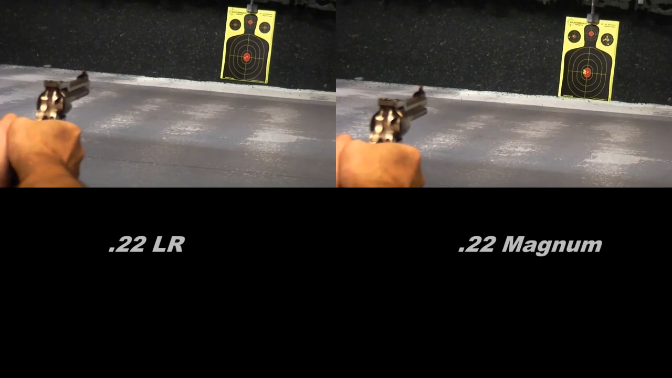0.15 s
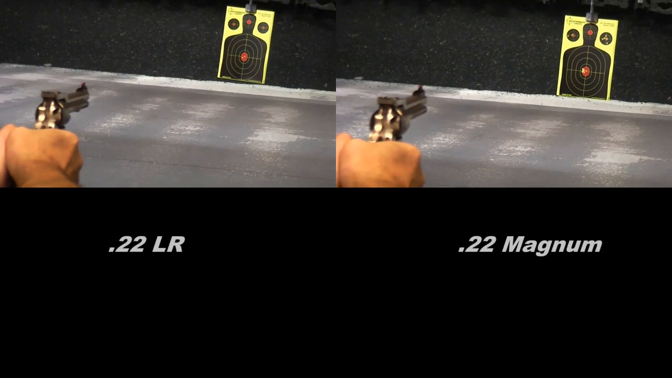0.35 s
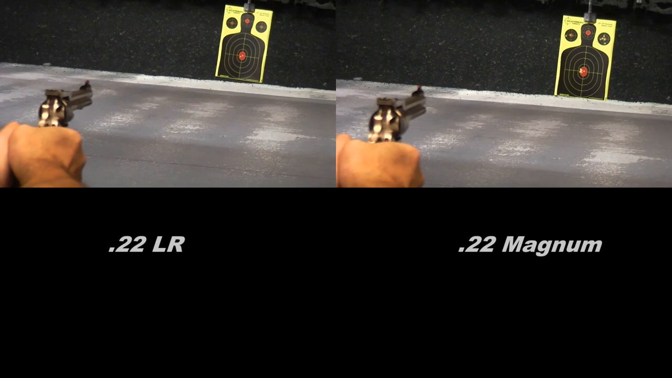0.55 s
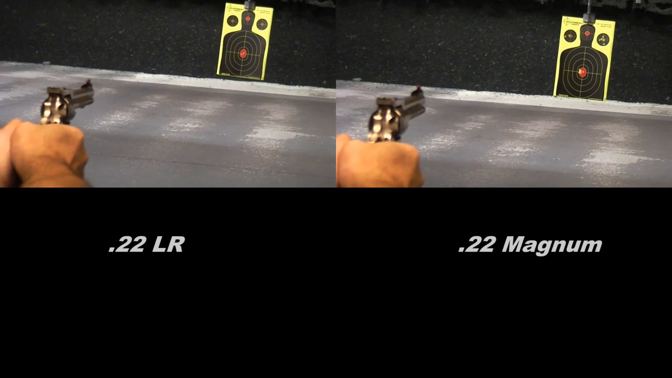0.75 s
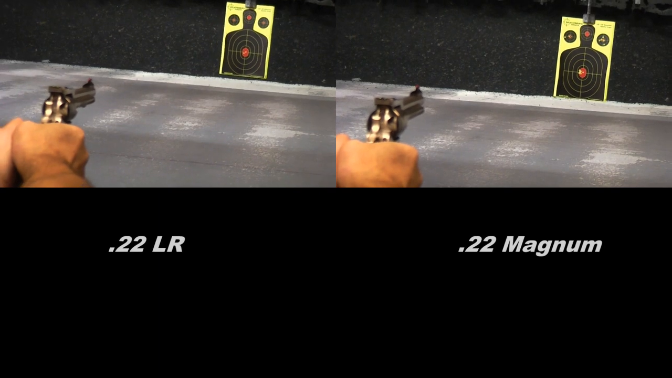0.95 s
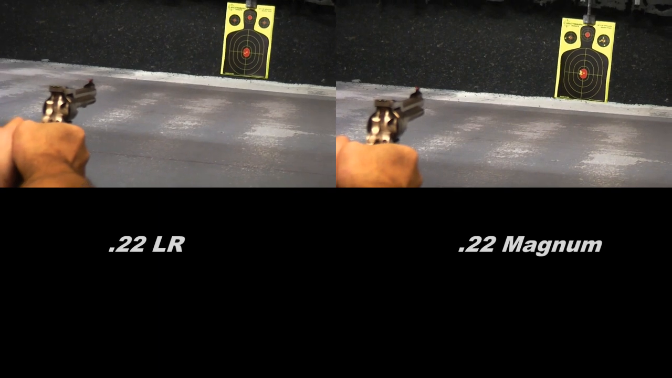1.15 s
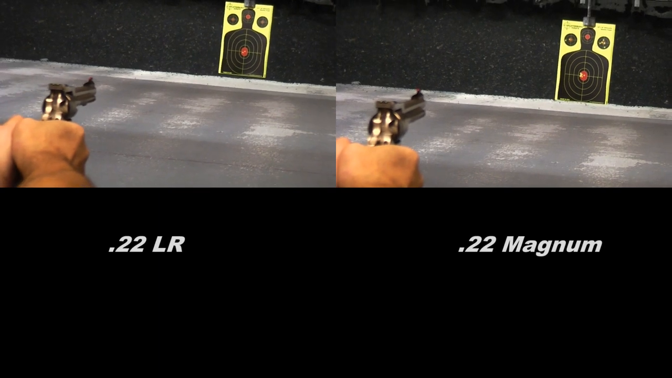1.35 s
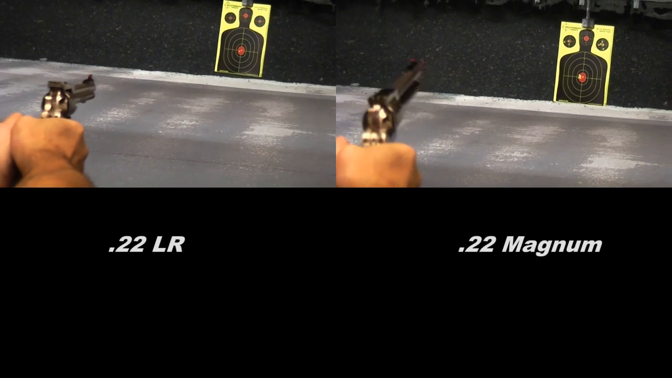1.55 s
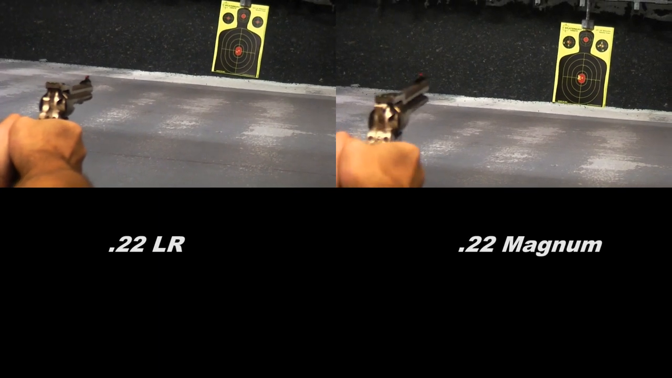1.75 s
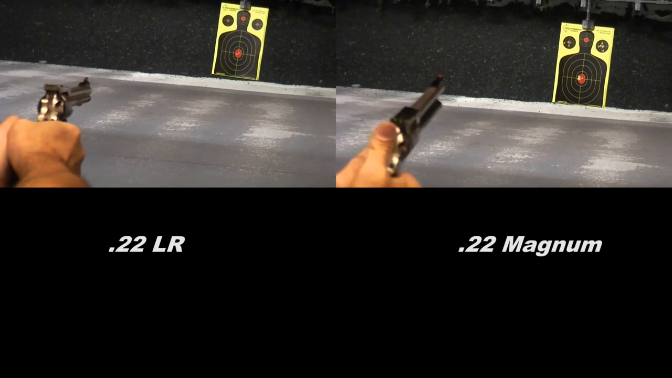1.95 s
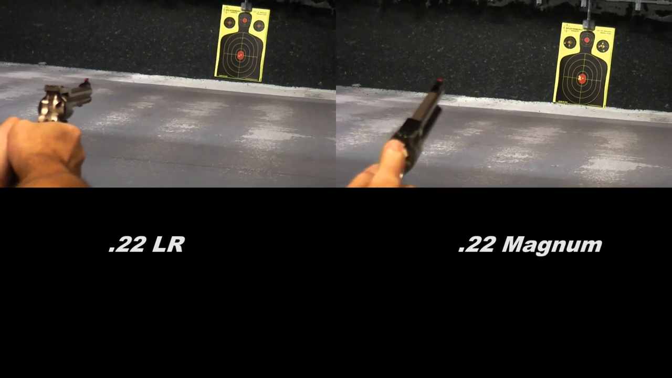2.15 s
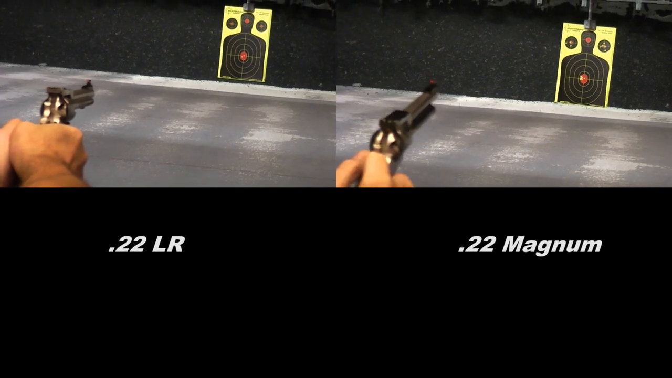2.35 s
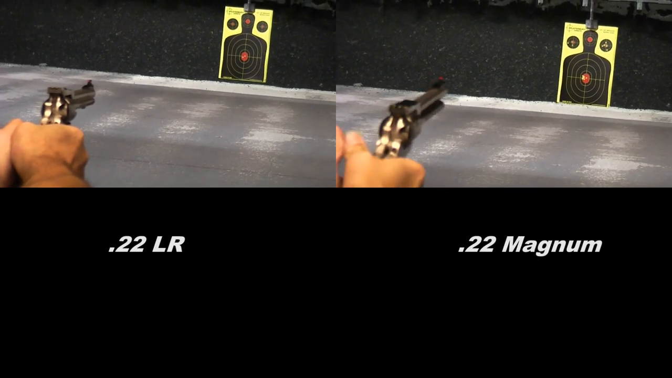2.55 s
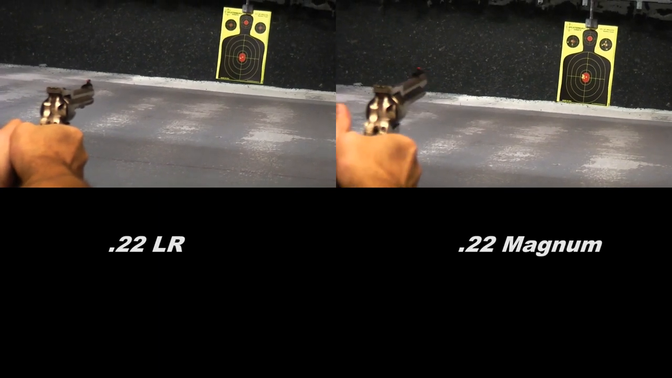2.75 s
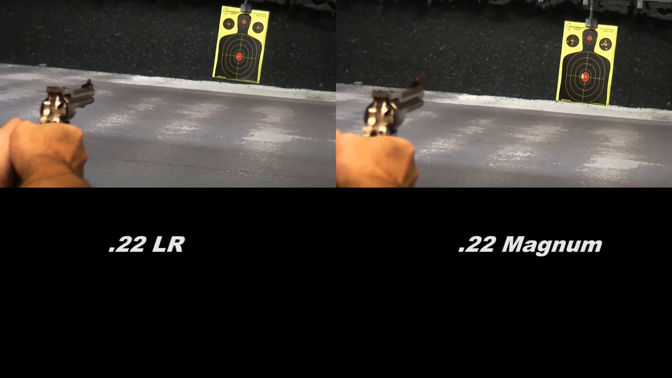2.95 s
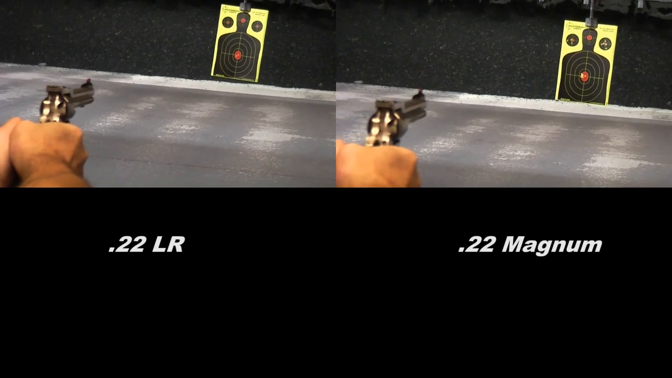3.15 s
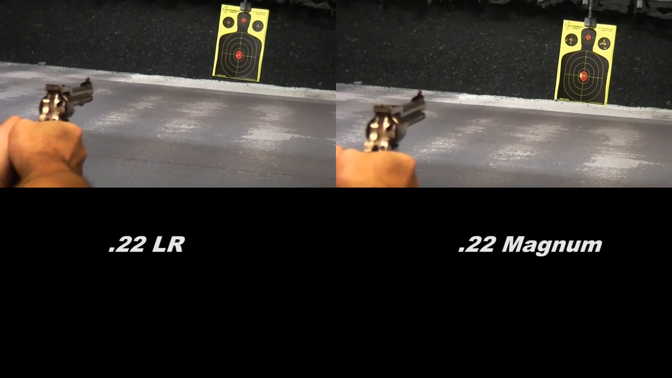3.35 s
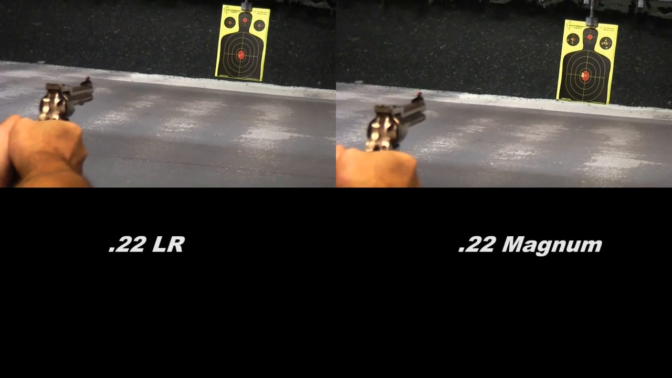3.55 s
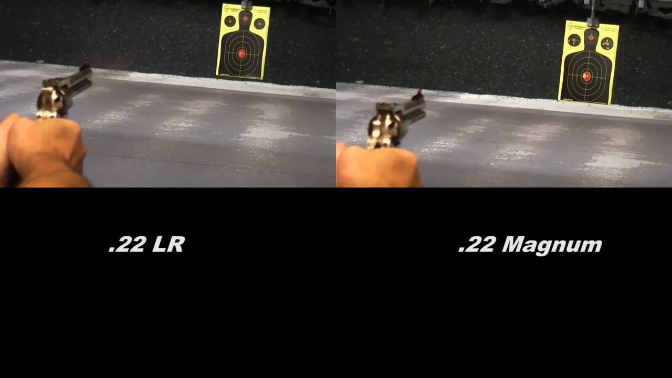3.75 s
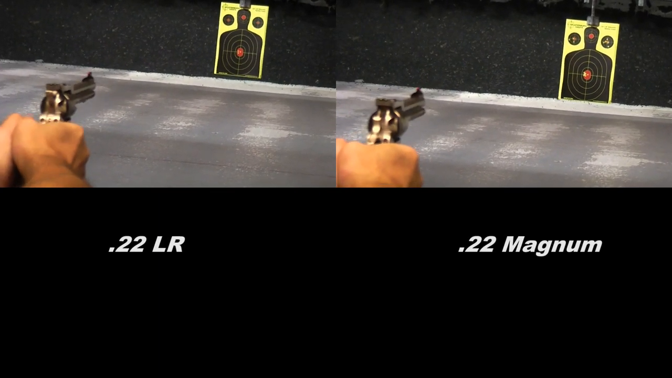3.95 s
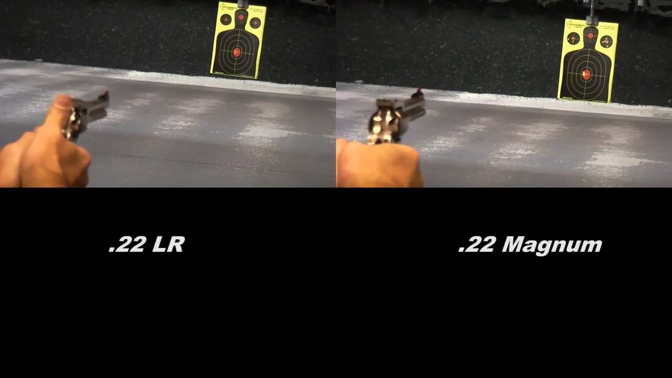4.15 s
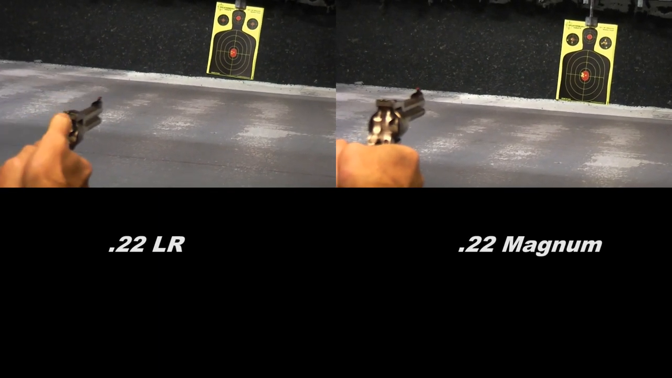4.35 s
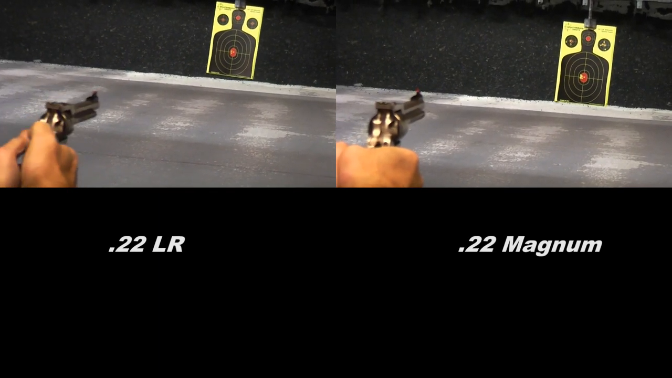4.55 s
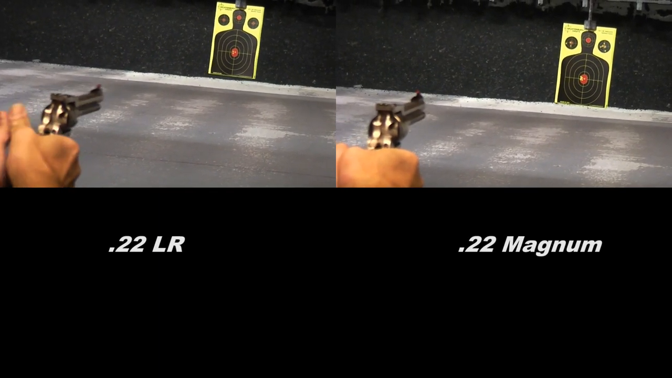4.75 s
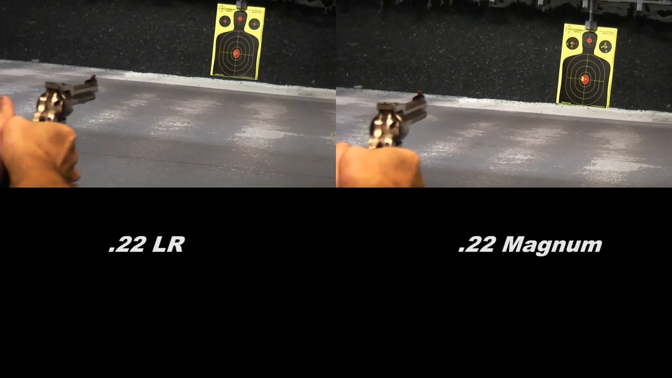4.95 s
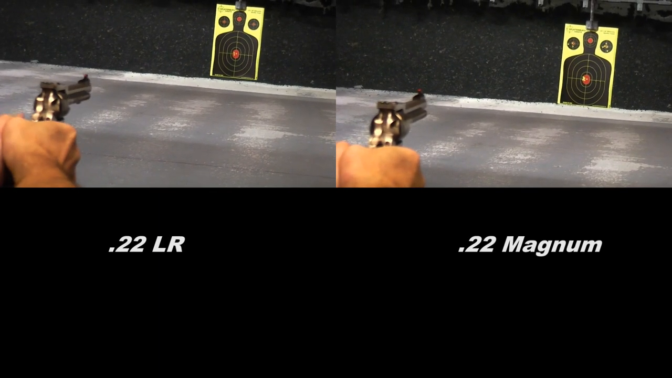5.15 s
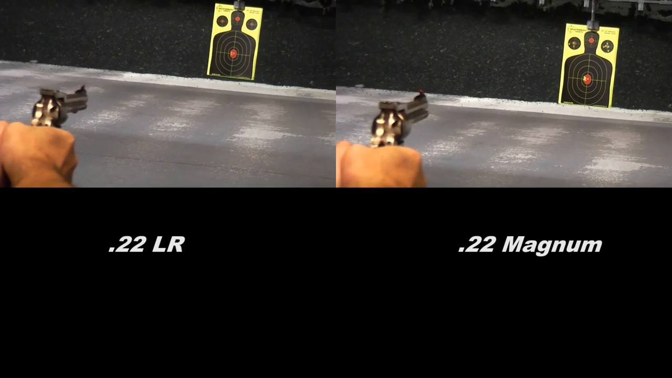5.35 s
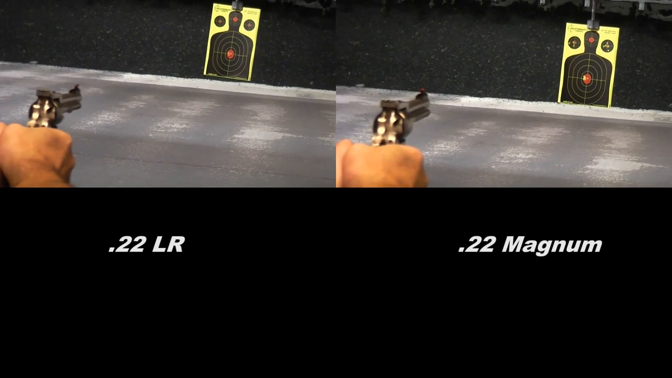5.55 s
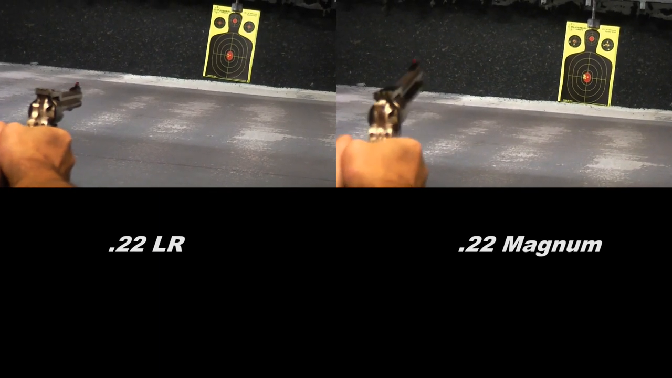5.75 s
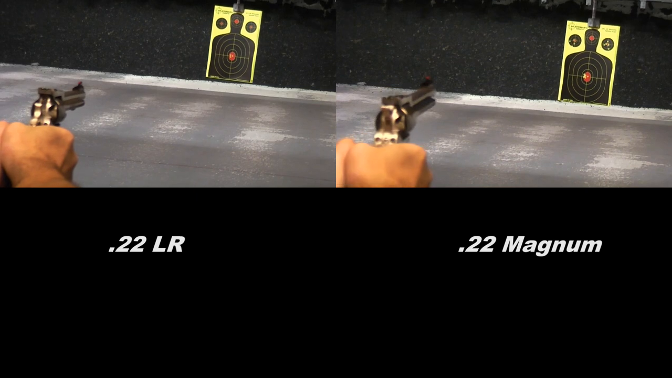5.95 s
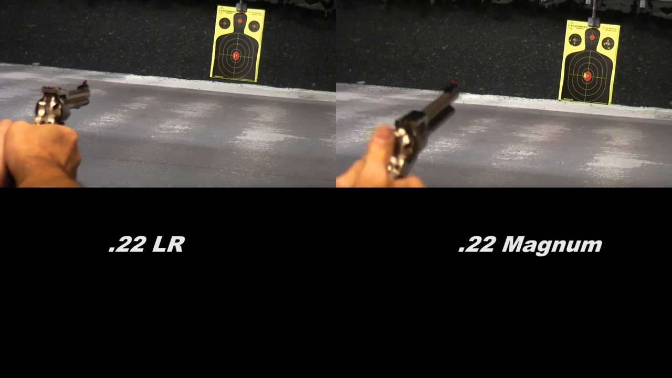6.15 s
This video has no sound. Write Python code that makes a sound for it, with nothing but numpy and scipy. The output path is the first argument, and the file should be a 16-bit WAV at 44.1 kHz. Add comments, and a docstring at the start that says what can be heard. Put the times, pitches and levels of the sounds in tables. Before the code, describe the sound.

Close microphones at an indoor range catch overlapping revolver fire. The tail of an earlier shot fades, then booming shots from the next bay alternate with a broad close blast, a muffled distant one and a brief bright crack. Steel clicks tick between them, loose brass rattles later, and two last shots end it mid-echo. The sound is wide, reverberant and squashed, with quiet ventilation rumble.

```python
"""Revolvers in a concrete range

Two guns close by and two in other bays fire in a long hall: each blast is shaped noise with a short
fade-in, a slap off the backstop and exponential decay. Booming partition echoes follow one of the guns.
Hammers click as damped steel modes, brass rattles as struck resonators, ventilation drones as noise.
The gunfire is the mix of two microphone feeds, each overloaded and ridden by its own gain control."""
import sys
import numpy as np
from scipy import signal
from scipy.io import wavfile

SR = 44100
rng = np.random.default_rng(int(sys.argv[2]) if len(sys.argv) > 2 else 0)


def unload_audio(sound):
    """Save the sound as a 16-bit wav file, at the path given as the first command line argument."""
    columns = np.transpose(np.atleast_2d(sound))
    # keep every value between -1 and 1, then stretch to whole-number steps
    steps = np.round(np.clip(columns, -1, 1) * 32767)
    wavfile.write(sys.argv[1], SR, steps.astype(np.int16))


N = 277385   # length [samples]

# Stereo field: (frequency [Hz], left-right correlation)
LIKENESS = [(50, -.1), (100, 0), (170, .2), (300, .75), (600, .78), (1200, .68), (2500, .6), (5000, .72),
            (9000, .5), (14000, .55)]
# Stereo balance: (frequency [Hz], left over right [dB])
LEFT_LEAD = [(60, 6), (180, -3), (550, -1), (1650, -0.5), (4970, 0), (15000, -0.5)]
HALVES = np.array([[.5], [-.5]])   # shares a left-right difference between the channels

# Relative spectrum of the ventilation: (frequency [Hz], density [dB per Hz])
AIR = [(18, -64), (30, -29), (43, -2), (86, -18), (120, 2), (160, -11), (196, -17), (304, -13),
       (373, -21.5), (577, -17.5), (11700, -51), (14000, -83)]
AIR_DB = -42   # rms level before the final filters

# Shots: (time [s], level [dB], gun, microphone feed)
SHOTS = [(.583, 3.5, "next bay", "second"), (1.592, 2.5, "heavy load", "second"),
         (1.869, 3, "next bay", "first"), (2.666, 1.5, "far bay", "second"),
         (3.301, 3.5, "next bay", "second"), (3.808, -4.5, "light load", "first"),
         (4.776, 0.5, "next bay", "first"), (5.768, 2, "heavy load", "second"),
         (6.153, -2, "next bay", "first")]
# Relative spectrum of each gun's early sound: (frequency [Hz], density [dB per Hz])
NEXT_BAY = [(24, -47), (40, -22), (300, -1), (461, 8.5), (535, 3), (606, 6), (1680, -17), (5300, -21),
            (15500, -57)]
HEAVY_LOAD = [(24, -54), (40, -6.5), (325, -0.5), (417, -7), (1160, -5), (2160, -8), (2450, -5.5),
              (4680, -9.5), (15500, -38)]
LIGHT_LOAD = [(290, -37), (500, -47), (1100, -1), (2330, 0), (2570, 1.5), (3280, -2), (4190, 1),
              (15500, -20)]
FAR_BAY = [(40, -22.5), (96, -10), (200, -5), (350, -3), (470, -6), (600, 3.5), (950, -0.5), (1300, -14),
           (1700, -13), (6000, -22), (15500, -59)]
# The same guns in that order: (fade-in to half amplitude [s], early sound over tail [dB],
# early decay t60 [s], left over right [dB], backstop echo over early sound [dB])
GUNS = [(0.026, -2.5, 0.74, 0, 1), (0.035, 10, 0.69, -1, -3.5), (0.008, 8.5, 0.2, .3, -17),
        (0.036, 17.5, 0.63, 0.5, -9)]
# Relative spectrum of the hall's tail 0.35 s after a shot: (frequency [Hz], density [dB per Hz])
TAIL = [(40, -46), (100, -9.5), (145, -9), (200, -6.5), (300, -2), (450, -9), (650, -3.5), (900, -1.6),
        (1300, -4.5), (1650, -11), (2800, -12), (5700, -21), (10000, -36.5), (15500, -103)]
# Reverberation of the hall: (frequency [Hz], t60 [s])
HALL_T60 = [(50, 1.1), (150, 1.46), (400, 1.047), (900, 1.485), (2000, 1.27), (4000, 1.14), (8000, 0.82),
            (14000, 0.28)]
ONSET_DB = 54.5   # the onset of each blast starts this far below full strength
BACKSTOP_S, BACKSTOP_HZ = 0.12, 2310   # round trip to the far wall; high-pass corner of its slap
EARLIER_AGO_S, EARLIER_DB = .62, -8.5   # a far-bay shot still dying away at the start

# Hammer and cylinder clicks: (time [s], level [dB], snap decay to 1/e [s])
CLICKS = [(.064, -43, 0.028), (.314, -50, 0.017), (2.365, -25.5, 0.0055), (2.424, -24, 0.0096),
          (4.419, -41, 0.011), (4.574, -58, 0.0081), (4.648, -33, .008), (5.259, -33, .015),
          (5.329, -35, 0.011), (5.449, -42, .012)]
# Modes of the steel frame: (frequency [Hz], relative level [dB], t60 [s])
STEEL = [(4400, 5, 0.043), (6340, -11, .04), (6880, -4, 0.056), (8500, -4, .03), (10900, -17, 0.084),
         (12600, -21, .05)]

# Runs of booming echoes of the next-bay gun:
# (delay [s], length [s], start frequency [Hz], end frequency [Hz], level before decay [dB])
BOOMS = [(.024, .06, 330.3, 1050, 6), (0.057, .05, 601, 650, 7.5), (.094, .09, 360, 440, 4),
         (0.131, .03, 722.6, 820, 6)]
ECHO_GAP_S, ECHO_SWELL_S, BOOM_T60_S = .02, .0042, 0.97   # spacing; rise to peak; decay from the shot on
ECHO_STRAY, ECHO_SPREAD_DB = .03, 2.0   # standard deviations of pitch (as a share) and level

# Bouts of rattling brass: (start [s], length [s], level of the rings [dB], fading [dB per s])
RATTLE = [(4.0, .82, -37.5, 6.5), (5.198, .33, -33.5, 110)]
# Modes of the brass: (frequency [Hz], bandwidth [Hz], relative level [dB])
BRASS = [(1820, 90, 1), (2850, 130, 2.5), (3360, 70, -6), (4140, 89, -7), (4560, 40, -3), (5000, 76, -6),
         (5400, 49, -7), (6480, 120, -4), (6930, 41, -7), (7900, 48, -6), (8400, 90, -16), (9500, 50, -15),
         (10530, 50, -15), (11900, 50, -22), (12700, 60, -27), (13400, 60, -17)]
RATTLE_RISE_S, RATTLE_FALL_S = 0.082, 0.028   # edges of a bout

# Fader of each feed: (level [dB])
FEED_DB = [-0.39, -0.08]
SENSE_S, ATTACK_S = .025, 0.16   # time constants of level sensing and of turning down
HOLD_DB, SQUEEZE = -16, 0.79   # level above which this share of the excess decibels is taken off
OVERLOAD = 0.39   # largest amplitude a feed can give, ahead of its fader
# The suppressor takes off two thirds of its drop at QUIET_DB, nearly all of it well below
QUIET_DB, QUIET_DROP_DB, QUIET_WIDTH_DB, QUIET_S = -20.5, 2, 1.2, 0.0078

CUTOFF_HZ = 16200   # from here up everything is at least 90 dB down


def from_db(db):
    """Logarithmic level: decibels to amplitude gain."""
    return np.exp(np.asarray(db) * np.log(10) / 20)


def rms_one(x):
    """Normalisation: scale to a root-mean-square of 1."""
    return x / np.sqrt(np.mean(x ** 2) + 1e-20)


def at_hz(points, hz):
    """Linear interpolation of a table on a log-frequency axis."""
    table = np.array(points)
    return np.interp(np.log(hz), np.log(table[:, 0]), table[:, 1])


def filtered(x, order, hz, kind):
    """Butterworth filtering: a maximally flat pass band."""
    return signal.sosfilt(signal.butter(order, hz, kind, fs=SR, output="sos"), x)


def bands(size):
    """Band analysis: third-octave stereo noise, correlated by pitch, as (centre Hz, noise)."""
    edges = 30 * 2 ** np.arange(0, 9.4, 1 / 3)
    white = rng.standard_normal((2, 2, size))
    out = []
    for k, (low, high) in enumerate(zip(edges, edges[1:])):
        # neighbouring bands draw on separate noise
        mid, side = filtered(white[k % 2], 3, [low, high], "band")
        hz = np.sqrt(low * high)
        alike = np.clip(at_hz(LIKENESS, hz), -1, 1)
        pair = np.sqrt(1 + alike) * mid + np.sqrt(1 - alike) * side * [[1], [-1]]
        out.append((hz, pair * from_db(at_hz(LEFT_LEAD, hz) * HALVES)))
    return out


def ventilation():
    """Stationary noise: steady air sound whose spectrum is strongest in a low drone."""
    air = sum(from_db(at_hz(AIR, hz)) * noise for hz, noise in bands(size=N))
    return from_db(AIR_DB) * rms_one(air)


def blast(colour, half_s, early_db, early_t60, pan_db, echo_db):
    """Reverberant decay: shaped noise with a soft onset, a quick early part over a slow tail."""
    t = np.arange(2 * SR) / SR
    early, tail = 0, 0
    for hz, noise in bands(size=len(t)):
        early = early + from_db(at_hz(colour, hz)) * noise
        decay_db = -60 * (t - .35) / at_hz(HALL_T60, hz)
        tail = tail + from_db(at_hz(TAIL, hz) + decay_db) * noise
    tail = tail / np.sqrt(np.mean(tail[:, :SR // 20] ** 2))   # rms 1 over the first 50 ms
    early = rms_one(early) * from_db(early_db + pan_db * HALVES)

    late = np.maximum(t - BACKSTOP_S, 0)
    slap = filtered(early[:, ::-1], 2, BACKSTOP_HZ, "high")   # reversed, so unlike the early sound
    slap = slap * from_db(echo_db - 60 * late / early_t60) * (1 - np.exp(-late / 0.0035))

    dying = early * from_db(-60 * t / early_t60) + slap + tail
    return dying / (1 + from_db(ONSET_DB * (1 - np.minimum(t / half_s, 3))))


def gunfire():
    """Superposition of impulse responses: a gun firing again from its place repeats its echoes."""
    colours = {"next bay": NEXT_BAY, "heavy load": HEAVY_LOAD, "light load": LIGHT_LOAD, "far bay": FAR_BAY}
    answers = {name: blast(colour, *gun) for (name, colour), gun in zip(colours.items(), GUNS)}
    answers["next bay"] = answers["next bay"] + booms()
    feeds = {name: np.zeros((2, N + 2 * SR)) for name in ("first", "second")}
    dying = answers["far bay"][:, round(EARLIER_AGO_S * SR):]
    feeds["first"][:, :dying.shape[1]] += from_db(EARLIER_DB) * dying
    for s, level_db, gun, feed in SHOTS:
        at = round(s * SR)
        feeds[feed][:, at:at + 2 * SR] += from_db(level_db) * answers[gun]
    return [feed[:, :N] for feed in feeds.values()]


def clicks():
    """Modal vibration: a short snap of noise with the damped modes of the steel frame."""
    t, out = np.arange(SR // 4) / SR, np.zeros(N + SR)
    scatter_db = rng.normal(0, 3, (len(CLICKS), len(STEEL)))
    hiss = filtered(rng.standard_normal(N + SR), 2, [3500, 12500], "band")
    for (s, click_db, snap_s), blows in zip(CLICKS, scatter_db):
        at = round(s * SR)
        rings = 0
        for (hz, level_db, t60), blow_db in zip(STEEL, blows):
            decay = from_db(level_db - 8.0 + blow_db - 60 * t / t60)
            rings = rings + decay * np.sin(2 * np.pi * hz * t)
        snap = from_db(-7.5) * hiss[at:at + len(t)] * np.exp(-t / snap_s)
        out[at:at + len(t)] += from_db(click_db) * (rings + snap)
    return out[:N]


def booms():
    """Repeated reflection: partition echoes in runs, stepping in pitch, stronger on the left."""
    t, out = np.arange(SR // 2) / SR, np.zeros(2 * SR)
    for delay, length, start_hz, end_hz, level_db in BOOMS:
        count = round(length / ECHO_GAP_S) + 1
        chance = rng.standard_normal((8, 3))
        for k, (stray, spread, phase) in enumerate(chance[:count]):
            glide = (end_hz / start_hz) ** (k * ECHO_GAP_S / length)
            hz = start_hz * glide * (1 + ECHO_STRAY * stray)
            age = np.maximum(t - delay - k * ECHO_GAP_S, 0) / ECHO_SWELL_S
            swell = age * np.exp(1 - age)
            gain = from_db(level_db + ECHO_SPREAD_DB * spread - 60 * t / BOOM_T60_S)
            out[:len(t)] += gain * swell * np.sin(2 * np.pi * (hz * t + phase))
    return out * from_db(5 * HALVES)


def ring(touches, hz, t60):
    """Damped resonance: a unit touch sets a decaying sine of height 1 ringing."""
    r, w = from_db(-60 / (t60 * SR)), 2 * np.pi * hz / SR
    return signal.lfilter([0, np.sin(w)], [1, -2 * r * np.cos(w), r * r], touches + 1e-18)


def rattle():
    """Random excitation of resonators: uneven touches ring thin brass as the pieces shift."""
    happens = rng.random(N) < 2500 / SR   # 2500 touches per second on average
    strength = from_db(2.1 * np.minimum(rng.exponential(1, N), 4))
    touches = happens * strength * rng.choice([-1, 1], N)
    t, rings = np.arange(N) / SR, 0
    steps = np.arange(0, t[-1] + .1, .05)
    for hz, width, level_db in BRASS:
        shifting_db = np.interp(t, steps, rng.uniform(-5, 5, len(steps)))
        mine = touches * (rng.random(N) < .3) * from_db(shifting_db)   # 30 % reach this mode
        rings = rings + from_db(level_db) * rms_one(ring(mine, hz, 2.2 / width))   # t60 = 2.2 / width
    scrape = filtered(touches, 2, [2000, 11000], "band")
    bouts = 0
    for s, length, level_db, fade_db in RATTLE:
        edges = np.minimum((t - s) / RATTLE_RISE_S, (s + length - t) / RATTLE_FALL_S)
        bouts = bouts + from_db(level_db - fade_db * np.maximum(t - s, 0)) * np.clip(edges, 0, 1)
    return (rms_one(rings) + 0.77 * rms_one(scrape)) * bouts


def follow(x, seconds):
    """Exponential averaging: one-pole smoothing with the given time constant."""
    keep = np.exp(-1 / (seconds * SR))
    return signal.lfilter([1 - keep], [1, -keep], x)


def feed_amplifier(x):
    """Compression and saturation: gain falls too late for the blast, which overloads."""
    level_db = 10 * np.log10(follow(np.mean(x ** 2, axis=0), SENSE_S) + 1e-12)
    wanted_db = SQUEEZE * np.maximum(level_db - HOLD_DB, 0)
    cut_db = np.minimum(wanted_db, follow(wanted_db, ATTACK_S))   # slow to turn down, quick to let go
    # a suppressor also turns quiet sound down
    above = (follow(level_db, QUIET_S) - QUIET_DB) / QUIET_WIDTH_DB
    quiet = 2 / (2 + np.exp(np.clip(above, -30, 30)))   # towards 1 in silence
    driven = x * from_db(-cut_db - QUIET_DROP_DB * quiet) / OVERLOAD
    return OVERLOAD * driven / (1 + driven ** 4) ** .25


def scene():
    """Linear superposition: both amplified feeds, the small metal sounds and the air."""
    small = clicks() + rattle()
    feeds = zip(gunfire(), FEED_DB)
    mixed = sum(from_db(fader_db) * feed_amplifier(feed) for feed, fader_db in feeds)
    return mixed + small * from_db(.8 * HALVES) + ventilation()


def record(dry):
    """Linear filtering: low middle fuller on the left, bass thinned, treble rolled off, top cut."""
    body = filtered(dry, 1, [150, 1100], "band")
    coloured = dry + body * [[.17], [-.14]]
    coloured = filtered(coloured, 3, 70, "high")
    coloured = filtered(coloured, 1, 12000, "low")
    return signal.sosfilt(signal.cheby2(16, 90, CUTOFF_HZ, fs=SR, output="sos"), coloured)


dry = scene()
out = record(dry)
unload_audio(out)
```